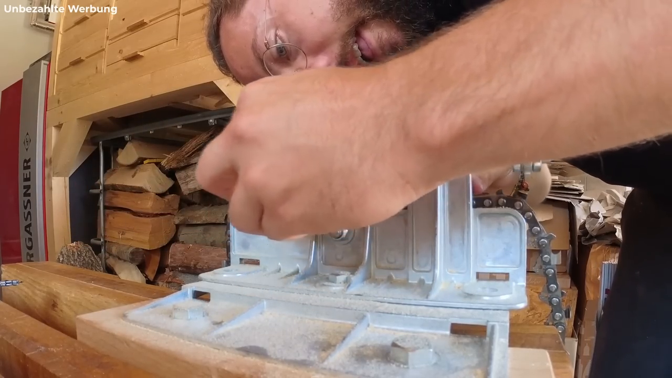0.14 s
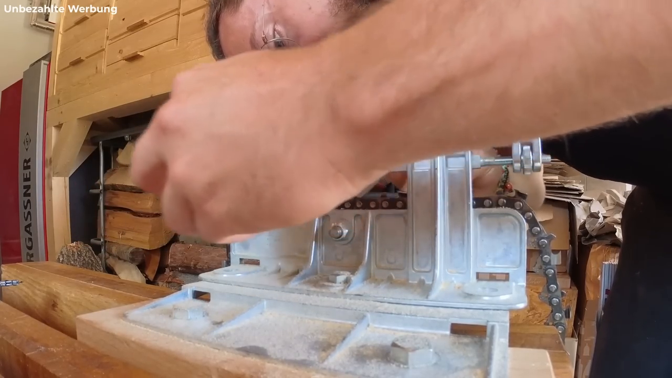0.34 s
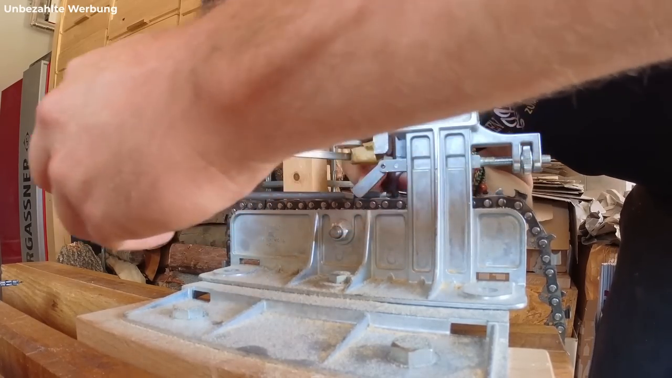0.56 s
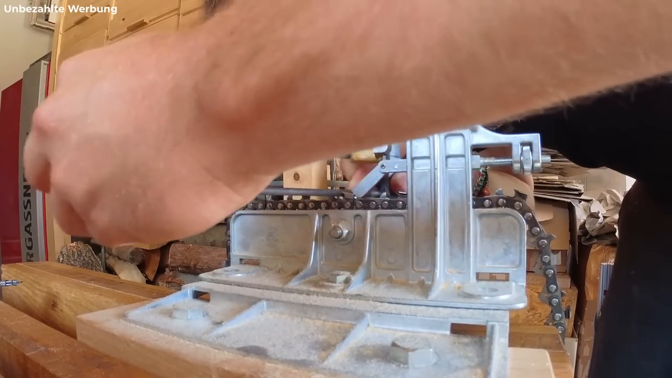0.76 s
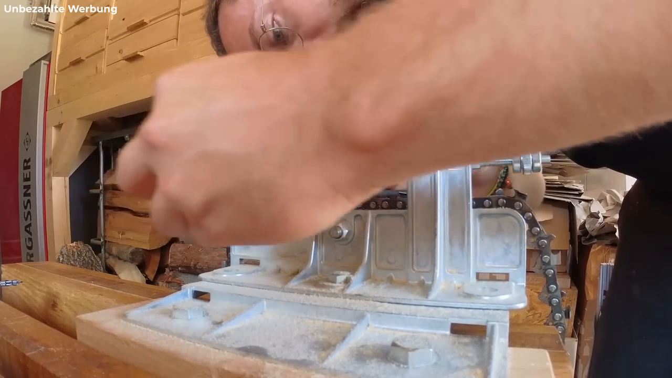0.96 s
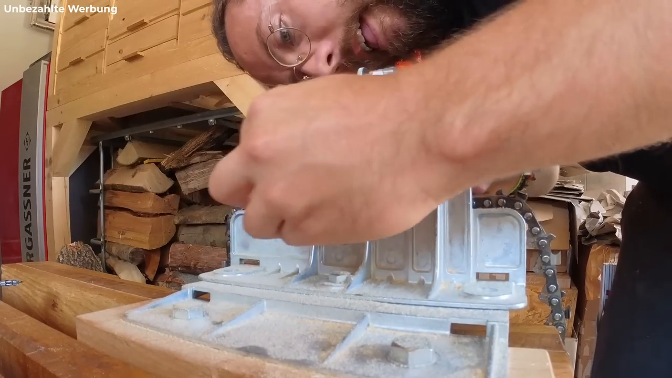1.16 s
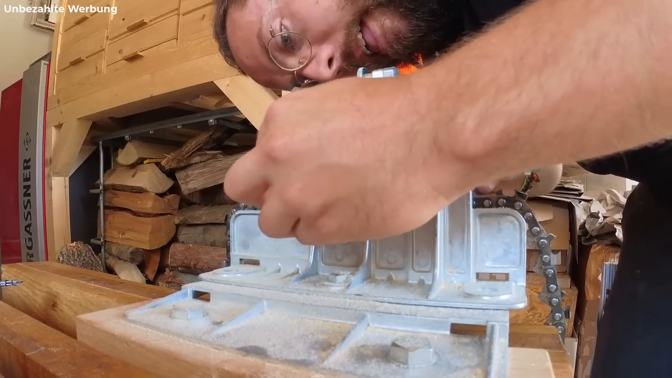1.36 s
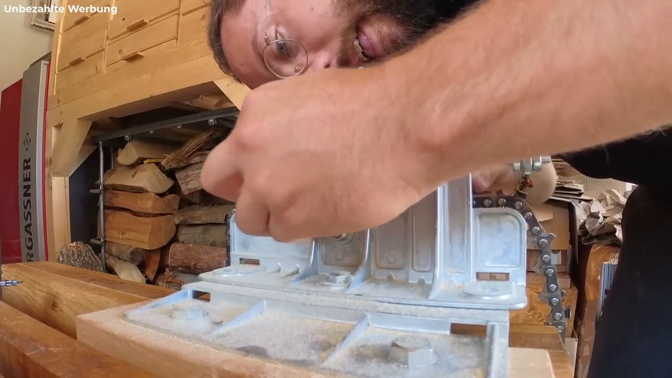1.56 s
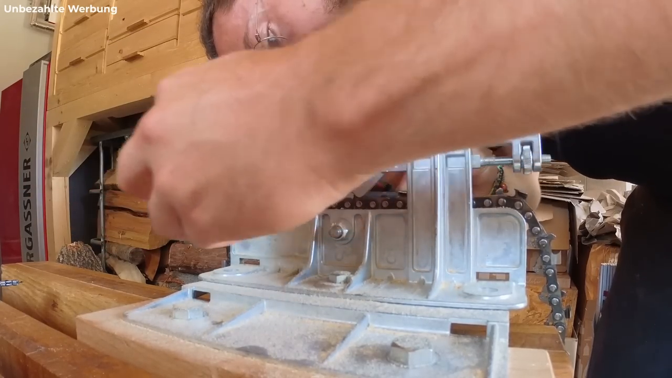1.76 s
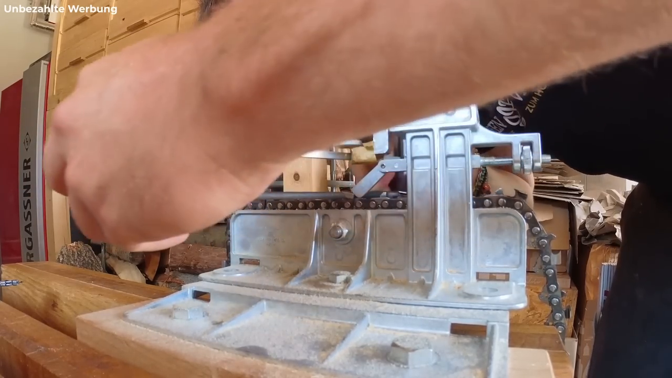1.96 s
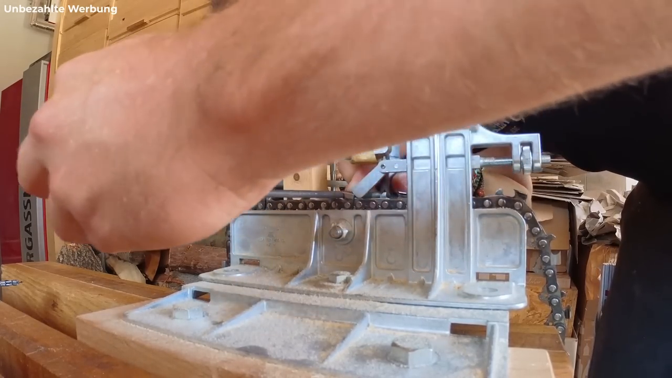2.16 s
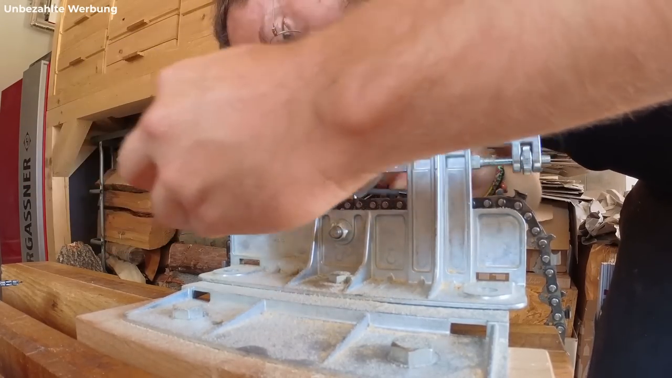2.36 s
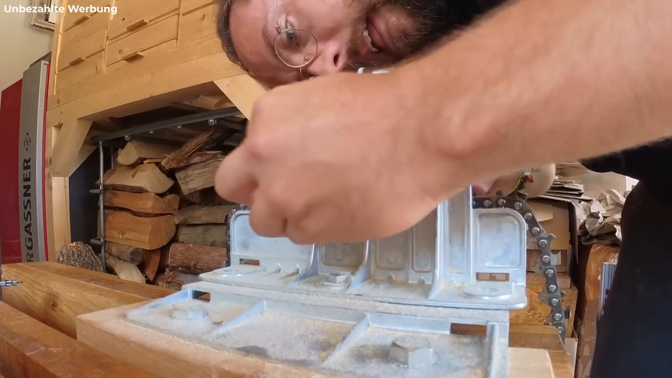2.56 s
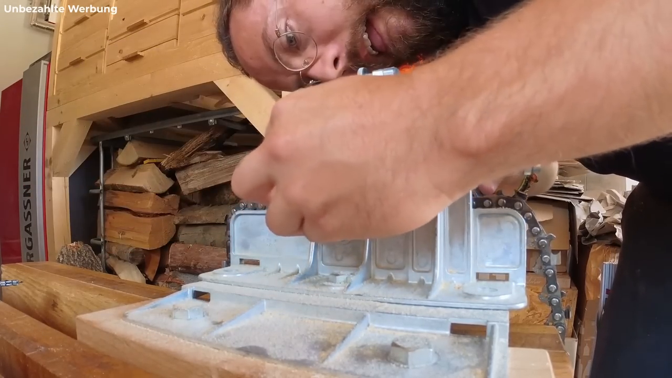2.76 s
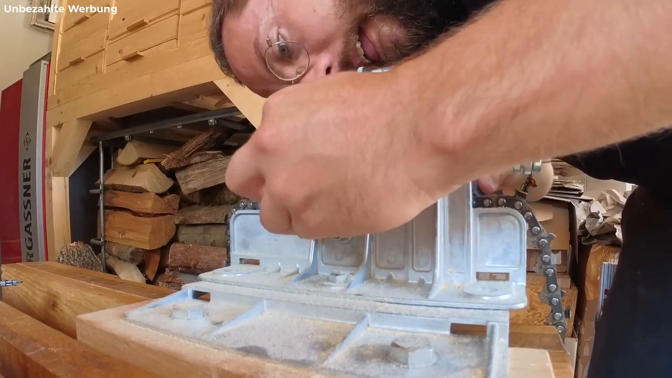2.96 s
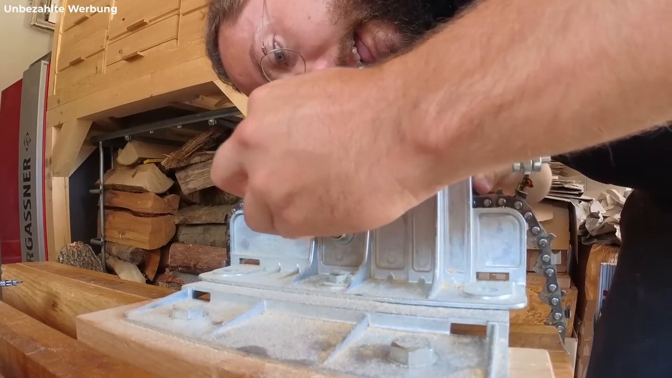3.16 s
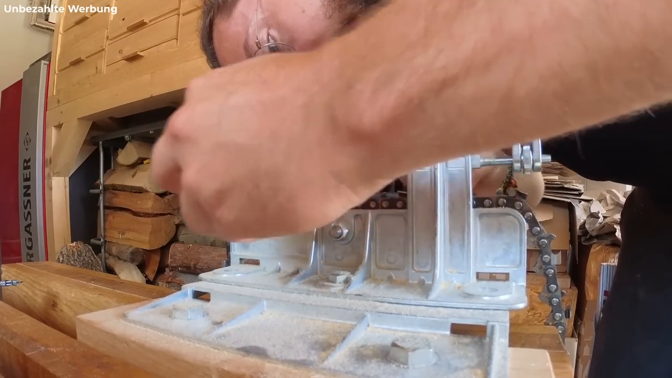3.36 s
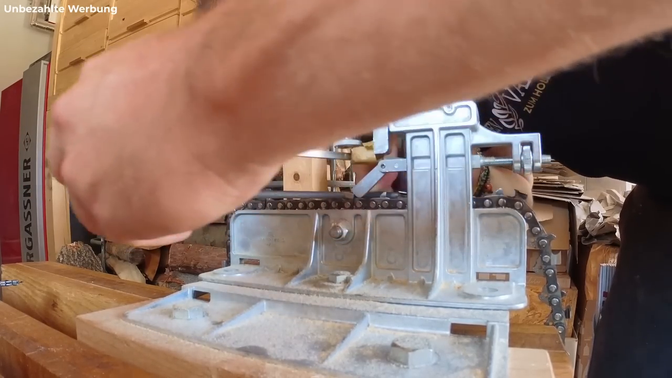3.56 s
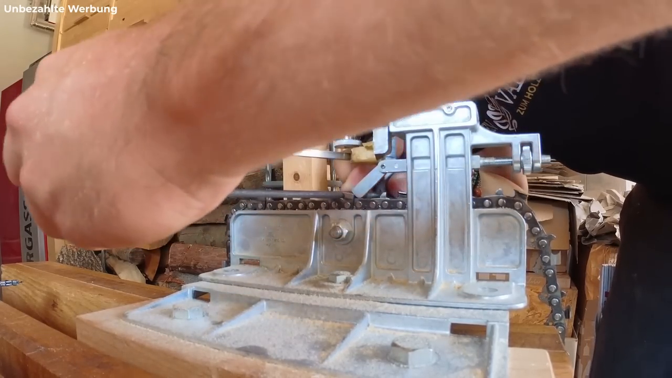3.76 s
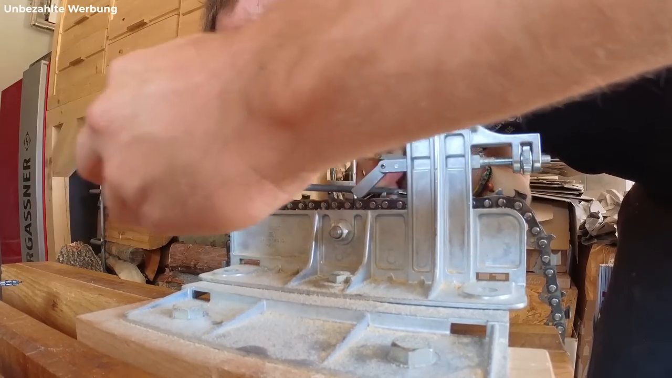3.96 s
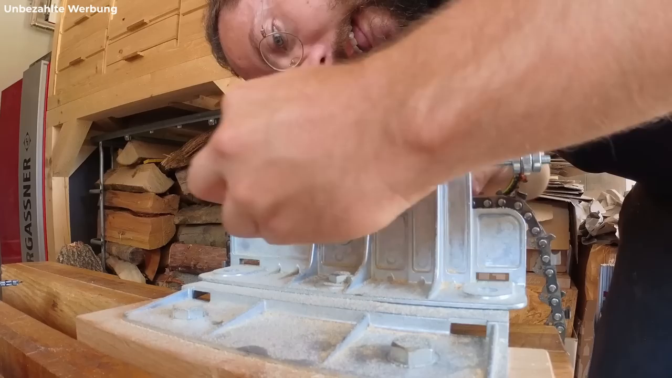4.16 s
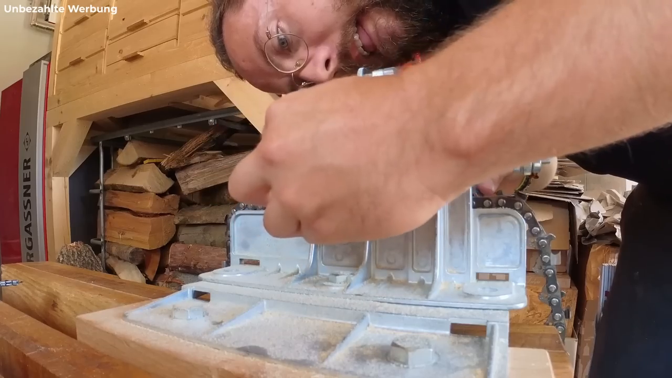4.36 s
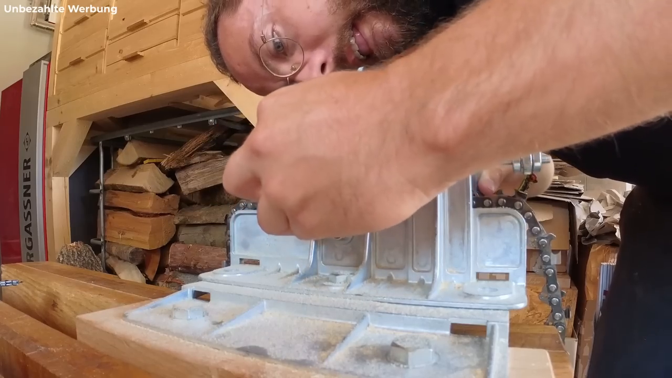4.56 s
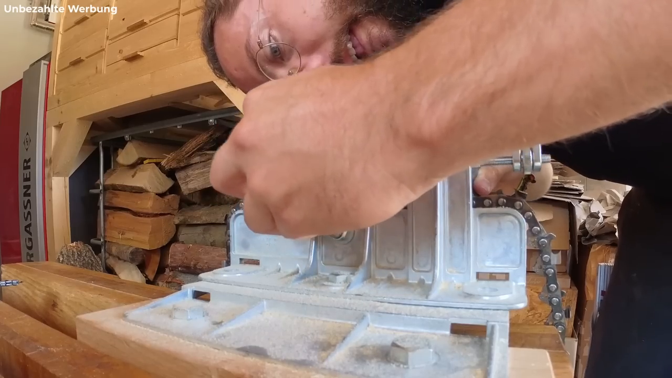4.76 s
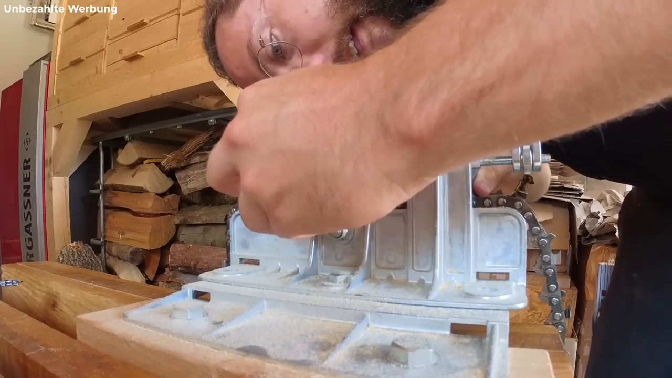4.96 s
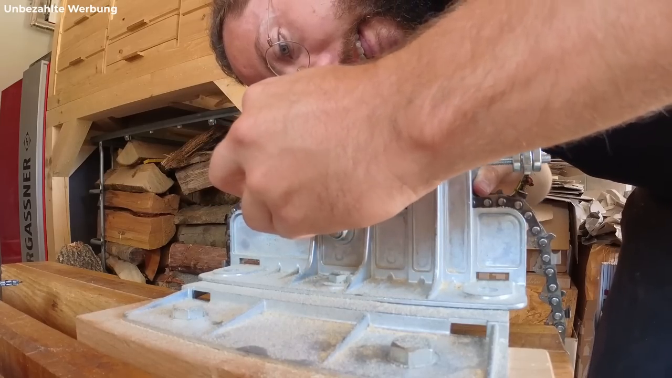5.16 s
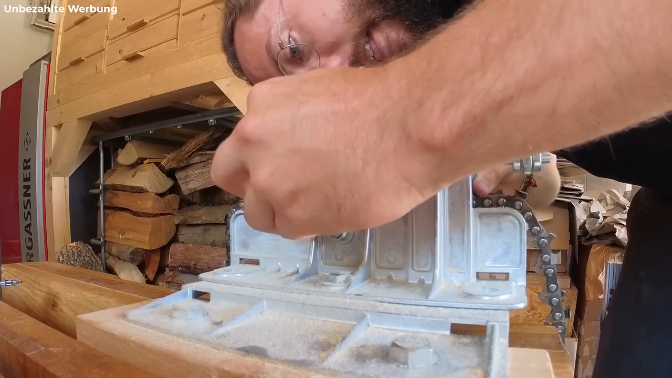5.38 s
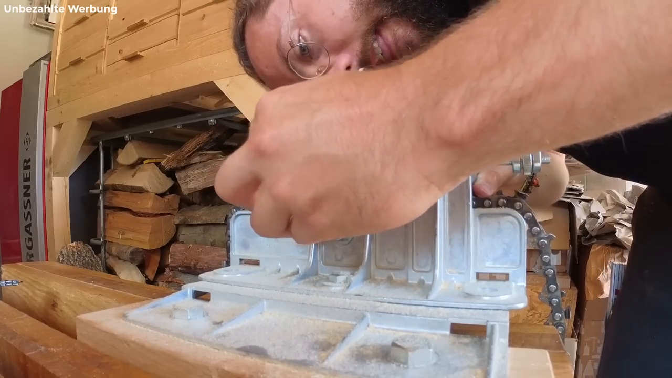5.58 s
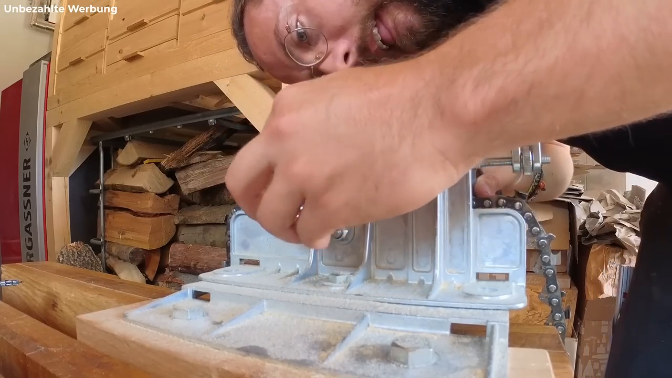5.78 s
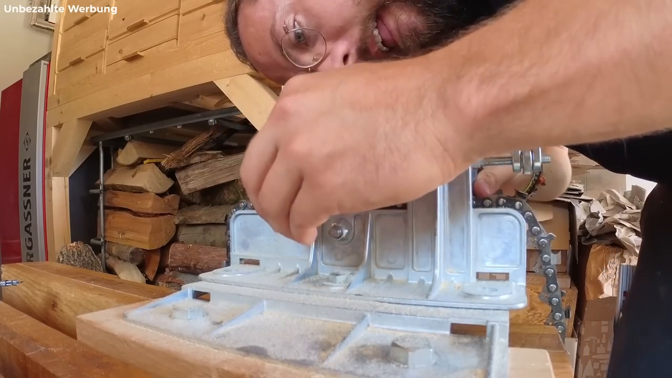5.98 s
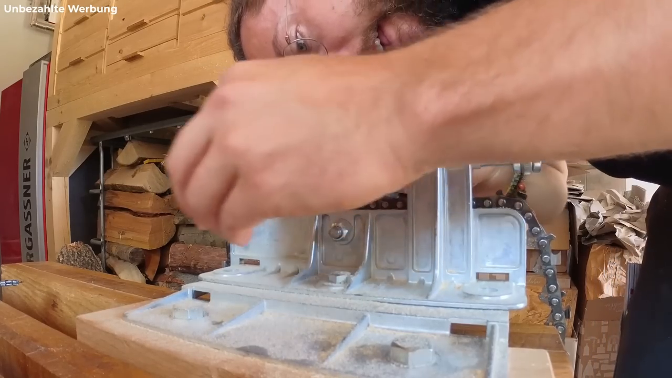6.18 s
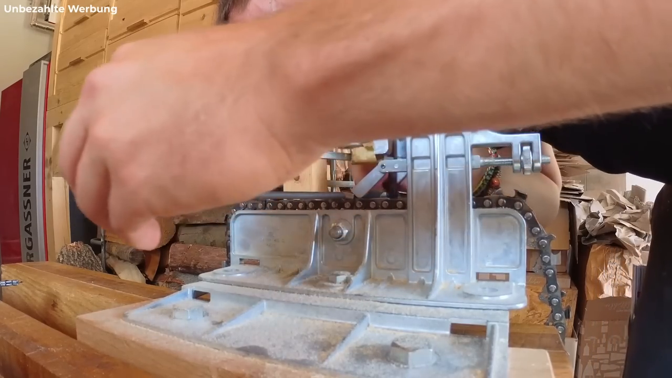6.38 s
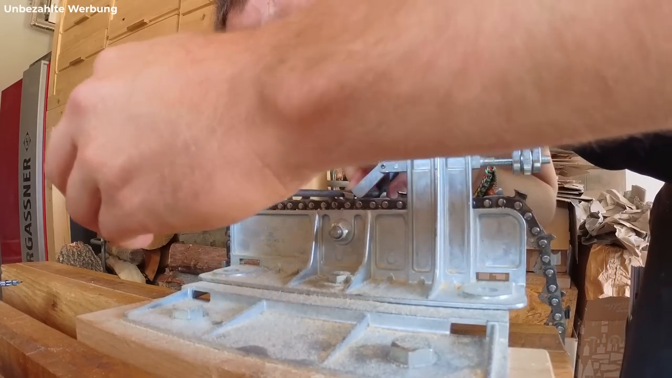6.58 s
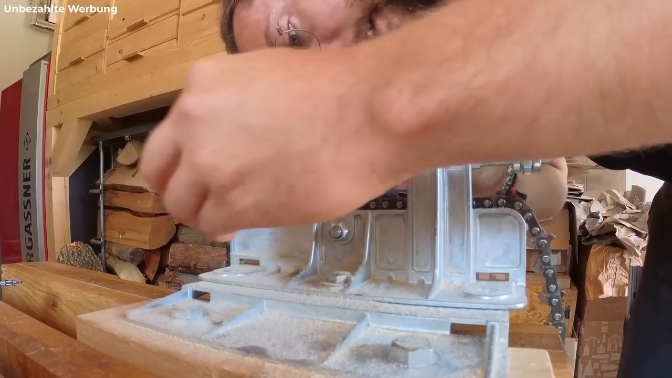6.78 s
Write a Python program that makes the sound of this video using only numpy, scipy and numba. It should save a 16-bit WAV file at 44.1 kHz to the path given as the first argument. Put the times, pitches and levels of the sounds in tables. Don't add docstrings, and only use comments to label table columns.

```python
import sys
import numpy as np
from scipy import signal
from scipy.fft import rfft, irfft, next_fast_len
from scipy.io import wavfile
from scipy.ndimage import uniform_filter1d, minimum_filter1d
from numba import njit

SR = 44100
rng = np.random.default_rng(int(sys.argv[2]) if len(sys.argv) > 2 else 0)


def volts(x):
    e = np.asarray(x, float) / 20
    return 10 ** e


def store_pcm(level_fs):
    pcm = np.round(np.clip(level_fs, -1, 1) * 32767).astype(np.int16)
    wavfile.write(sys.argv[1], SR, np.atleast_2d(pcm).T)


N = 301203
T_S = np.arange(N) / SR


def unit(x):
    return x / np.sqrt(np.mean(x ** 2))


def walk(rate_hz):
    k = int(SR / rate_hz)
    held = np.repeat(rng.standard_normal(N // k + 1), k)
    return unit(uniform_filter1d(uniform_filter1d(held, k), k)[:N])


def on_log_hz(table, hz):
    table_hz, value = np.transpose(table)
    return np.interp(np.log(hz), np.log(table_hz), value)


def coloured(table, channels):
    size = next_fast_len(N)
    hz = np.maximum(np.fft.rfftfreq(size, 1 / SR), 1)
    spectrum = rfft(rng.standard_normal((channels, size))) * volts(on_log_hz(table, hz))
    return unit(irfft(spectrum, size)[:, :N])


def band(x, lo_hz, hi_hz, order):
    return signal.sosfilt(signal.butter(order, [lo_hz, hi_hz], "bandpass", fs=SR, output="sos"), x)


def decay(x, fade_s):
    return signal.lfilter([1], [1, -np.exp(-1 / (fade_s * SR))], x)


def bumps(table):
    return sum(db * np.exp(-((T_S - s) / half_s) ** 2) for s, half_s, db in table)


def knocks(s, db, contact_s):
    spikes = np.zeros(N)
    spikes[(np.array(s) * SR).astype(int)] = volts(db)
    push = np.sin(np.pi * np.arange(.5, contact_s * SR) / (contact_s * SR))
    return np.convolve(spikes, push / push.sum())[:N]


# (middle [s], half
# length [s], pitch [Hz], rise [dB])
SWELLS = [(.33, 0.088, 1650, -4), (0.341, .03, 1380, 2.5), (0.359, 0.023, 973, 19.5),
          (0.48, 0.016, 2780, 1), (0.549, 0.068, 970, 12), (.56, 0.06, 4000, 0.5), (.74, 0.03, 2820, 7),
          (0.772, 0.043, 1650, 11), (1.13, 0.083, 635, 19), (0.146, .06, 4500, -9),
          (0.998, 0.075, 1180, 20), (0.926, .03, 872, 19), (1.68, 0.028, 3620, 3), (1.832, 0.064, 944, 11),
          (1.901, 0.051, 3050, -5), (1.62, 0.12, 4430, -16), (1.947, 0.16, 578, -7.5),
          (2.048, 0.035, 2000, 10), (2.057, 0.036, 4030, 15), (2.166, 0.041, 4000, 7.5),
          (2.184, 0.066, 1900, 6.5), (2.128, 0.025, 3270, -15), (2.569, 0.07, 3160, 7.5),
          (2.589, 0.015, 645, 11), (3.356, 0.054, 4500, -11.5), (3.915, 0.038, 4500, 23),
          (3.968, 0.027, 1180, 14), (3.402, 0.099, 2100, 3.5), (3.414, 0.036, 1378, -5),
          (3.454, 0.12, 2960, -4.5), (3.493, 0.043, 4200, 14), (3.561, 0.056, 3670, 7),
          (3.608, 0.055, 967, 12), (3.658, 0.027, 1970, 12.5), (3.685, 0.069, 4000, 12),
          (4.226, 0.018, 644, 13), (4.31, 0.04, 650, 10.5), (4.674, 0.027, 654, 7.5),
          (4.882, 0.05, 3680, 9), (4.89, 0.032, 625, 9), (4.894, 0.07, 702, -1), (5.007, 0.047, 1110, 11.5),
          (6.774, 0.053, 1270, 18), (6.334, 0.057, 4310, 17.5), (6.387, 0.077, 980, 10.5),
          (6.391, 0.029, 1105, 10.5), (6.413, 0.036, 2700, 7), (6.423, 0.15, 1436, 4.5),
          (6.444, 0.073, 1680, -5), (6.757, .05, 666, 15.5),
          (.25, 0.17, 60, -1), (0.598, 0.068, 60, -1.5), (1.144, .07, 110, -7), (1.325, 0.19, 192.8, 13),
         (1.117, 0.064, 154, 11), (1.985, 0.2, 446, 5), (2.1, 0.14, 332, 2.5), (2.265, .1, 190, 6.5),
         (2.316, 0.052, 154.4, 12), (2.92, 0.12, 281, -7.5), (3.056, 0.088, 121, 18), (3.093, .1, 60, 0.5),
         (4.174, 0.039, 59.8, -7), (4.34, 0.065, 59.7, 3.5), (4.457, .1, 289, -6), (4.503, 0.088, 192, 6.5),
         (4.91, 0.12, 60.2, 7), (4.942, 0.044, 145.5, 6.5), (4.992, 0.14, 280, 4),
         (5.248, 0.028, 151.7, 18.5), (5.27, .03, 60, 5), (5.302, 0.023, 278, -1),
         (6.316, 0.044, 453, -13.5), (6.429, 0.033, 155, 2), (0.96, 0.045, 276, 10),
         (0.129, 0.19, 192, -10.5), (1.3, 0.02, 281, 7), (1.424, 0.022, 162, 2.5), (2.617, .05, 279, 0.5),
         (3.09, 0.032, 288, -10), (4.007, 0.024, 157, 0.5), (4.155, 0.054, 153, -15), (4.337, .03, 155, 5),
         (2.24, 0.059, 110, -4.5), (0.953, 0.11, 60, -16), (2.247, .1, 60, -6)]


def swell_db(hz):
    reach, step = .065, 64
    t = T_S[::step]
    db = 0 * t
    for s, half_s, at_hz, rise_db in SWELLS:
        apart = (np.log(hz / at_hz) / reach) ** 2
        if apart < 10:
            db = db + rise_db * np.exp(-apart - ((t - s) / half_s) ** 2)
    return np.repeat(db, step)[:N]


def ring(modes, rub, blows, flicker_db, tilt_db=0., pivot_hz=1000, own_db=None):
    out = np.zeros((2, N))
    shares = [volts(tilt_db * np.log2(hz / pivot_hz)) for hz, *_ in modes]
    power = [volts(2 * db) * width_hz for _, width_hz, db, _, _ in modes]
    rub = rub * np.sqrt(sum(power) / sum(p * s ** 2 for p, s in zip(power, shares)))
    for (hz, width_hz, db, pan_db, lead), share, gain_db in zip(modes, shares, own_db or [0] * len(modes)):
        width_hz = max(width_hz, 4)
        level = volts(gain_db + swell_db(hz) + flicker_db * walk(8))
        force = rub * share * level * rng.standard_normal(N) + blows
        force = band(force, hz / 1.134, min(hz * 1.234, SR / 2.2), order=1)
        pole = np.exp((2j * np.pi * hz - np.pi * width_hz) / SR)
        z = signal.lfilter([1], [1, -pole], force)
        z *= volts(db) * width_hz * np.sqrt(4 * np.pi / sum(power) / SR)
        right = (z * np.exp(1j * lead)).imag
        out += np.array([volts(pan_db / 2) * z.imag, volts(-pan_db / 2) * right])
    return out


PATCH_HZ = (2400, 5300, 6900, 8600, 10500, 13000, 16500)


def patchy(x):
    return sum(volts(2.5 * walk(12)) * band(x, lo, hi, order=3) for lo, hi in zip(PATCH_HZ, PATCH_HZ[1:]))


# (frequency [Hz], density [dB per Hz])
ROOM = [(18, -38.5), (30, -27), (43, -27.5), (183, -7.5), (578, -23), (3000, -38), (4940, -42),
        (10000, -48), (14100, -44), (15600, -43)]


def room():
    noise = volts(-74 + 0.7 * walk(30)) * coloured(ROOM, channels=2)
    return band(noise, 15, PATCH_HZ[0], order=2) + patchy(noise)


# (frequency [Hz], level [dB], left minus right [dB], fades after [s])
LOOSE = [
    (4468, -12, -4.5, 9),
    (4900, 1.5, -5.5, 9),
    (11456, 3, -4, 4.45),
    (11580, -7.5, -3.5, 4.3),
]
# (time [s], level [dB])
LOOSE_DB = [(3.04, -125), (3.14, -97), (3.88, -100), (3.95, -91), (4.1, -100), (4.3, -99), (4.8, -93.5),
            (4.9, -110), (5.45, -112), (5.6, -105), (5.75, -115), (5.8, -130)]


def loose_part():
    fade_db_s = 42.5
    level_db = np.interp(T_S, *np.transpose(LOOSE_DB))
    out = np.zeros((2, N))
    for hz, db, pan_db, until_s in LOOSE:
        mode_db = level_db + db + swell_db(hz) - fade_db_s * np.maximum(T_S - until_s, 0) + 4 * walk(9)
        tone = np.sqrt(2) * np.sin(2 * np.pi * np.cumsum(hz + 9 * walk(25)) / SR)
        out += volts(mode_db + np.array([[pan_db], [-pan_db]]) / 2) * tone
    return out


def teeth():
    rate_hz, scatter_db, fade_s = 500, -1.5, 0.00087
    catch = (rng.random(N) < rate_hz / SR) * volts(scatter_db * rng.exponential(size=N))
    return unit(2.4 + unit(decay(catch, fade_s)))


# (time [s], rise [dB])
CLUMPS = [(.136, 8), (0.148, 5.5), (.186, 1.5), (0.204, 6.5), (.234, 8), (0.288, 3), (.332, 2), (0.426, 3),
          (.453, 1), (.48, 3), (.555, 1.5), (.667, -3), (.717, 6), (1.577, 7), (1.624, 10), (1.655, 1),
          (1.68, 3), (1.728, 4), (1.761, 5.5), (1.793, 7.5), (2.018, 4.5), (2.133, 0), (2.259, 5),
          (3.337, 4.5), (3.364, -1), (3.406, 0), (3.472, 6), (4.865, 4.5), (6.197, 1.5), (6.392, 2.5),
          (6.584, 5.5)]


def clumps():
    s, db = np.transpose(CLUMPS)
    rise_db = np.zeros(N)
    rise_db[(s * SR).astype(int)] = db
    return volts(decay(rise_db, 0.0096) - 1)


# (frequency [Hz], density [dB per Hz])
RASP = [(2470, -32.5), (4200, -7.5), (4510, -5.5), (6740, -13.5), (7570, -10.5), (9960, -14), (11400, -11),
        (12500, -10), (15000, -9.5), (15600, -9)]
# (frequency [Hz], left minus right [dB])
RASP_BALANCE = [(4200, -5), (6000, -5), (10000, -7), (11300, -15.5), (13500, -1), (15700, -10.5)]
# (frequency [Hz], width [Hz], level [dB], left minus right [dB], right leads [rad])
SHANK = [(4810, 18, 3.5, -7, .3), (5750, 120, -5.5, -4.5, .3), (7600, 46, -7, -4, .3),
         (7800, 67, -13, -6, .3), (9600, 60, -13.5, -6, .3), (11440, 360, 0, -10.5, 0.26),
         (11900, 280, -1.5, -5, 3), (14700, 340, -1.5, -1.5, 2.8)]
# (time [s], level [dB])
TICKS = [(0.086, -65), (0.19, -65), (0.8906, -72.5), (1.614, -64), (2.5147, -59), (2.643, -60.5),
         (2.7042, -54.5), (3.009, -65), (3.0431, -72.5), (3.2507, -54), (4.3312, -66.5), (4.8367, -52.5)]


def air(rasp):
    tick_s, tick_db = np.transpose(TICKS)
    rasp = rasp + volts(-6) * decay(knocks(tick_s, tick_db, 0.00013), 0.005)
    hiss = []
    for side in (1, -1):
        spectrum = [(hz, db + side * on_log_hz(RASP_BALANCE, hz) / 2) for hz, db in RASP]
        hiss.append(coloured(spectrum, channels=1)[0])
    shank = band(ring(SHANK, volts(-4.5) * rasp, 0, 4.1), 4000, 16000, order=2)
    return volts(np.array([[2.5], [6.5]])) * rasp * patchy(np.array(hiss)) + shank


# (time [s], push into boards [dB], pressure on steel [dB], bite of teeth [dB])
STROKES = [
    [(0.066, -27, -57.5, -29), (0.1, -26.5, -47, -26), (0.33, -23.5, -39.5, -12.5),
     (0.42, -25, -42.5, -15.5), (0.5, -28.5, -33.5, -11), (0.61, -22.5, -37, -13), (0.78, -29, -42.5, -16)],
    [(1.52, -33, -51, -25.5), (1.68, -26, -39.5, -20), (1.78, -26.5, -36.5, -14.5), (2.07, -26, -36.5, -16),
     (2.13, -27.5, -45.5, -16), (2.23, -28, -45, -14.5), (2.32, -45.5, -69, -17.5)],
    [(2.518, -30, -42, -10.5), (2.6, -26, -43.5, -13), (2.66, -26, -38.5, -20.5)],
    [(3.25, -25.5, -42.5, -14), (3.29, -21.5, -33, -18.5), (3.45, -28.5, -39.5, -13),
     (3.67, -26.5, -35.5, -14), (3.75, -26.5, -39.5, -17.5), (3.88, -26.5, -47, -12.5)],
    [(4.838, -25, -42, -19), (4.9, -24, -38, -15), (4.97, -33, -58, -19.5)],
    [(6.176, -32.5, -54, -18), (6.19, -23.5, -41.5, -19), (6.21, -27, -38, -12.5),
     (6.39, -24.5, -35.5, -12.5), (6.58, -28, -42, -18.5), (6.62, -34, -61, -8.5)],
]


def along():
    travel_s = 0.66
    return sum((T_S - rows[0][0]) / travel_s * (T_S > rows[0][0]) * (T_S < rows[-1][0] + .08)
               for rows in STROKES)


def at_place(best):
    spread = 0.3
    return -6.5 * (1 - np.exp(-((along() - best) / spread) ** 2))


# (centre [Hz], level [dB], share of the fade off place)
SCRAPE = [(1500, -8, .1), (2300, -15, .3), (3300, -11, .8), (4500, -5, 1.5)]


def scrape(file):
    wake_db = at_place(.55)
    out = np.zeros((2, N))
    for hz, db, share in SCRAPE:
        noise = band(rng.standard_normal((2, N)), hz / 2.8, hz * 2.3, order=2)
        out += volts(db + share * wake_db + swell_db(hz) + 2.3 * walk(31)) * file * noise
    return out


def shed(x):
    echo_db, t60_s = -17, 0.14
    t = np.arange(SR // 3) / SR
    tail = rng.standard_normal((2, len(t))) * np.exp(-np.log(1000) * t / t60_s) * (t > .004)
    tail = band(tail, 400, 1500, order=1)
    tail = tail / np.sqrt(np.sum(tail ** 2) / 2)
    return x + volts(echo_db) * signal.fftconvolve(x, tail, axes=1)[:, :N]


# (time [s], blow [dB], vice [dB re blow], file [dB re blow], rocking [dB re blow])
KNOCKS = [(0.065, -13.5, -40, -54.5, -23), (0.086, -18.5, -3.5, -22.5, -50), (0.852, -23.5, -2.5, -58, -61),
          (0.893, -25, -1, -18, -45), (0.925, -13.5, -7, -39, -47), (1.254, -9, -9.5, -42, -28),
          (1.309, -14.5, -7.5, -35, -30.5), (2.521, -11, -12.5, -22, -61), (2.704, -7, -3, -30.5, -20),
          (2.789, -13, -15, -36, -23), (3.046, -17.5, -20.5, -21.5, -36.5), (3.138, -13, -37, -49, -40),
          (3.252, -13.5, -9.5, -31, -17), (3.946, -5.5, -12, -44.5, -48), (4.264, -10.5, -29, -44, -38),
          (4.325, -12.5, -31.5, -34.5, -22), (4.458, -5.5, -19.5, -50.5, -35),
          (4.637, -19.5, -20.5, -40.5, -32), (4.819, -22, -11, -40, -38.5),
          (4.837, -14.5, -5.5, -25, -35.5), (5.246, -45.5, -40.5, -57.5, -34), (5.736, -37, -24, -56, -21),
          (6.181, -10, -66, -66, -60), (6.68, -25.5, -1.5, -19.5, -30)]
# (time [s], level [dB])
SNAGS = [(0.234, -36), (0.272, -22), (0.289, -38.5), (0.4805, -37), (0.529, -32), (0.556, -21.5),
         (1.367, -28.5), (1.623, -37), (1.728, -35), (1.763, -22.5), (2.018, -41), (2.304, -40),
         (2.81, -52), (3.373, -26), (3.409, -27.5), (3.472, -36.5), (3.564, -23.5), (4.863, -27.5),
         (6.281, -53), (6.391, -21.5), (6.584, -51), (6.702, -39.5), (6.718, -33)]
# (frequency [Hz], width [Hz], level [dB], left minus right [dB], right leads [rad])
VICE = [(565.4, 34, 7, 1.6, 2), (643.6, 39, 10, 8.5, 4.5), (696.4, 35.5, 2.5, 2, -0.6),
        (826, 56, -10, 3.8, -0.5), (914.4, 53, 0, 2.9, 2.5), (997.3, 20, -6, 16, -0.5),
        (1099, 49, -8, 13, 1.5), (1180, 100, -10, 6, -0.3), (1269, 53, -11.5, 3, 0.24),
        (1384, 110, -8.5, 0.5, 1.23)]
# (frequency [Hz], width [Hz], level [dB], left minus right [dB], best place on stroke [0-1])
FILE = [(1663, 33, 7, -2, 0.4), (1810, 62, 1, -4, 0.9), (1935, 40, 3, 1.5, 0.73),
        (2056, 120, -0.5, -0.5, 0.3), (2670, 390, -8, 0.5, 1), (3050, 430, -15, 3, 0.4),
        (3700, 55, -13, 2, 0.3), (4000, 150, -15.5, 1.5, 0.92), (4200, 100, -21.5, 0.5, 0.5)]
# (frequency [Hz], width [Hz], level [dB], left minus right [dB])
SINGING = [(2198, 48, 5.5, 4.5), (2378, 80, -2, -5), (3620, 230, -11.5, 1.5)]
# (frequency [Hz], right leads [rad])
AIR_LEAD = [(1600, .1), (1900, -.35), (3300, -.4), (3650, -1.3), (4000, -.4)]
# (middle [s], half length [s], rise [dB])
SONGS = [
    (0.312, 0.095, 8),
    (1.634, 0.063, 10),
    (1.764, 0.045, 10),
    (2.559, 0.083, 9),
    (3.279, 0.042, 9.5),
    (4.85, 0.051, 6),
    (6.248, 0.064, 10.5),
    (6.42, 0.044, 8),
]


def metal(vice, file_db, vice_db):
    knock_s, blow_db, vice_rel_db, file_rel_db, _ = np.transpose(KNOCKS)
    snag_s, snag_db = np.transpose(SNAGS)
    snags = knocks(snag_s, snag_db + 24, 0.0004)
    vice_blows = knocks(knock_s, blow_db + vice_rel_db + 12, 0.00061) + snags
    tilt_db = file_db + 16 + 0.17 * np.clip(vice_db + 31.5, -8, 8)
    cast = ring(VICE, vice * teeth() * np.sqrt(clumps()), vice_blows, 2.6, tilt_db, pivot_hz=800)

    file = vice * volts(file_db) * teeth() * clumps()
    blows = knocks(knock_s, blow_db + file_rel_db + 19.5, .0002) + volts(-22.5) * snags
    file_modes = [(*m[:4], on_log_hz(AIR_LEAD, m[0])) for m in FILE]
    song_modes = [(*m[:4], on_log_hz(AIR_LEAD, m[0])) for m in SINGING]
    song_db = -10.5 + bumps(SONGS)
    steel = ring(file_modes, volts(5.5) * file, blows, 2.5, own_db=[at_place(m[4]) for m in FILE])
    steel += ring(song_modes, volts(5 + 1.4 * song_db) * file, volts(-14) * blows, 1.5)
    rattle = decay(blows, .012) / 30
    steel += scrape(file + volts(-7.5) * rattle)
    return shed(band(cast, 554, 2300, order=3) + band(steel, 1975, 4000, order=2))


# (time [s], level [dB])
PATS = [
    (2.304, -23.5),
    (4.147, -38),
    (4.572, -32),
    (4.684, -38),
    (5.643, -57),
    (5.889, -42),
    (6.034, -49.5),
    (6.127, -68),
]
# (frequency [Hz], width [Hz], level [dB], left minus right [dB], right leads [rad])
BOARDS = [(122.7, 13, -10, -6.5, 3.3), (153, 27, 1, -4.5, 2.35), (189.9, 10, 1.5, 1, 2.656),
          (231, 110, -34, 2, 1.1), (277.45, 20.9, 4, -5, 2.558), (335, 27.4, -1, 0.5, 2.43),
          (443, 57.6, -4.5, 2.5, 2.704), (460.5, 34, -26, 5, 5.5)]
MIDDLE_HZ = (215, 325)


def bench(push, deep_db, upper_db):
    knock_s, blow_db, _, _, rock_db = np.transpose(KNOCKS)
    pat_s, pat_db = np.transpose(PATS)
    blows = knocks(knock_s, blow_db + 20, 0.0017) + knocks(pat_s, pat_db + 30, 0.0013)
    lo_hz, hi_hz = MIDDLE_HZ
    deep = [m for m in BOARDS if m[0] < lo_hz]
    middle = [m for m in BOARDS if lo_hz < m[0] < hi_hz]
    upper = [m for m in BOARDS if m[0] > hi_hz]
    left_over = np.sqrt(np.maximum(1 - volts(2 * deep_db) - volts(2 * upper_db), .05))
    boards = ring(deep, volts(deep_db + 2.5) * push, volts(-4) * blows, 2.6)
    boards += ring(middle, volts(4) * left_over * push, blows, 1.7)
    boards += ring(upper, volts(upper_db + 8) * push, volts(-14.5) * blows, 0.92)

    noise = rng.standard_normal((3, N))
    shake = noise[0] * np.array([[-.4], [.9]]) + .5 * noise[1:]
    shake *= volts(-4 + swell_db(60) + 5 * walk(10)) * push * (push / 0.061) ** 0.06
    shake += knocks(knock_s, blow_db + rock_db + 46.5, 0.0026) * np.array([[-.3], [1.1]])
    return band(boards, 90, 564, order=5) + band(shake, 24, 100, order=2)


def contact(rows):
    s, push, press, bite = np.transpose(rows)
    after_s = np.maximum(T_S - s[-1], 0)
    before_db = 74000 * np.maximum(s[0] - T_S, 0)
    return np.array([np.interp(T_S, s, push) - 230 * after_s - before_db,
                     np.interp(T_S, s, press) - 350 * after_s - before_db,
                     np.interp(T_S, s, bite) - 118 * after_s,
                     np.clip((T_S - s[0]) / (s[-1] - s[0]), 0, 1)])


# (time [s], push [dB])
HANDS = [(0.0, -57), (0.05, -80), (0.06, -34), (1.06, -48.5), (1.24, -48), (2.44, -46), (2.51, -42),
         (2.9, -51.5), (2.97, -47.5), (3.03, -36), (3.23, -42), (4.14, -46), (4.25, -47.5), (4.8, -53),
         (5.1, -87.5), (5.6, -89), (5.82, -56.5), (6.12, -64.5), (6.17, -46)]
# (time [s], length [s], push [dB], pressure [dB], bite [dB])
NUDGES = [(0.847, 0.0099, -26.5, -55.5, -46.5), (0.898, 0.037, -27, -42.5, -19.5),
          (1.245, 0.014, -27.5, -43, -31), (1.286, 0.024, -33.5, -51.5, -23),
          (1.324, 0.009, -32, -43, -22.5), (1.35, 0.014, -30.5, -40, -25.5), (1.383, 0.014, -30, -48, -23),
          (2.693, 0.024, -25, -49, -18.5), (2.784, 0.0029, -25, -43, -23),
          (3.039, 0.0065, -25.5, -47.5, -15), (3.137, 0.0079, -29, -56.5, -32),
          (3.941, 0.047, -26, -43.5, -20), (4.253, 0.039, -28, -41, -21), (4.306, 0.04, -29, -45.5, -19.5),
          (4.451, 0.0044, -24.5, -46, -28.5), (4.583, 0.045, -44.5, -80.5, -39.5),
          (4.624, 0.052, -31.5, -57, -43), (4.806, 0.011, -32, -53.5, -16),
          (5.229, 0.0093, -60.5, -92, -16), (5.621, 0.034, -55.5, -99, -21), (5.724, 0.034, -36, -77, -17),
          (5.868, 0.0037, -48.5, -104.5, 2.5), (6.638, 0.039, -29.5, -76.5, -45),
          (6.686, 0.042, -26, -49, -20)]
WEIGHT = [(0.76, 0.19), (0.062, 0.89), (0.62, 0.35), (0.043, 0.49), (0.043, 0.94), (0.43, 0.65)]


def hand():
    drag_db, drag_bite_db, nudge_weight = -27.5, -16.5, 0.59
    swell, scratch = 3, 3
    rest_db = np.interp(T_S, *np.transpose(HANDS))
    now = np.array([rest_db, rest_db + drag_db, np.full(N, drag_bite_db), np.ones(N)])
    contacts = list(zip(STROKES, WEIGHT))
    for s, length_s, push, press, bite in NUDGES:
        landing = (s, push, press - swell, bite + scratch)
        lift = (s + max(length_s, .002), push, press, bite)
        contacts.append(([landing, lift], (nudge_weight, nudge_weight)))
    for rows, (first, last) in contacts:
        new = contact(rows)
        new[3] = first + (last - first) * new[3]
        push = np.maximum(now[0], new[0])
        now = np.vstack([push, np.where(new[1] > now[1], new[1:], now[1:])])
    return *now, now[0] <= rest_db


def scene():
    push_db, vice_db, file_db, place, resting = hand()
    deep_db = np.minimum(-8 - 0.14 * (push_db + 30) + 10.5 * place, 1.5)
    deep_db += uniform_filter1d(resting * (-5 - deep_db), size=2000)
    upper_db = np.maximum(-4 + 0.97 * (vice_db - push_db + 9), -31)
    upper_db += uniform_filter1d(resting * (-17.5 - upper_db), size=1000)
    rasp_db = -25 + 1.4 * (file_db + 11)
    effort = volts(0.9 * np.maximum(push_db + 33.5, 0)) * volts(1.6 * walk(25))
    vice = volts(vice_db) * effort
    rasp = vice * volts(rasp_db) * teeth() * clumps()
    mix = room() + loose_part() + air(rasp)
    mix += metal(vice, file_db, vice_db)
    return mix + bench(volts(push_db) * effort, deep_db, upper_db)


@njit
def limit(x, top, release):
    gain, g = np.empty(len(x)), 1.
    for i in range(len(x)):
        g = min(g + (1 - g) * release, top / max(x[i], top))
        gain[i] = g
    return gain


def low_pass(x):
    return signal.sosfilt(signal.butter(12, 15790, fs=SR, output="sos"), x)


def record(dry):
    ceiling_db, release_s, ahead = -11, 0.075, 131
    gain = limit(np.abs(dry).max(axis=0), float(volts(ceiling_db)), 1 / (release_s * SR))
    gain = uniform_filter1d(minimum_filter1d(gain, size=ahead), size=ahead // 2)
    lowpass = signal.ellip(8, .3, 50, 15750, fs=SR, output="sos")
    return low_pass(signal.sosfilt(lowpass, dry * gain))


dry = scene()
out = record(dry)
store_pcm(out)
```